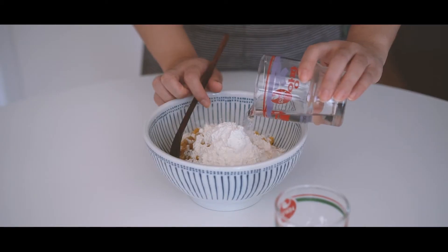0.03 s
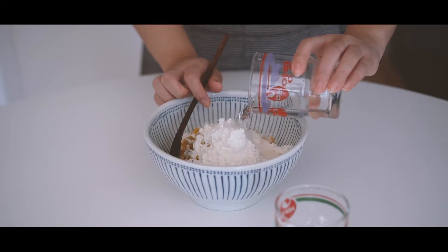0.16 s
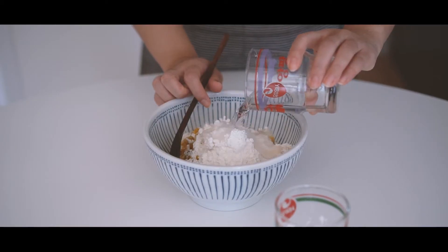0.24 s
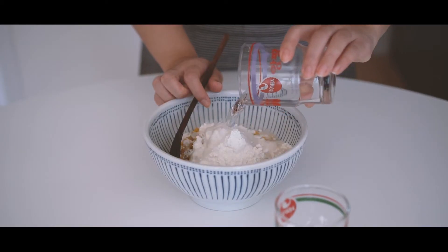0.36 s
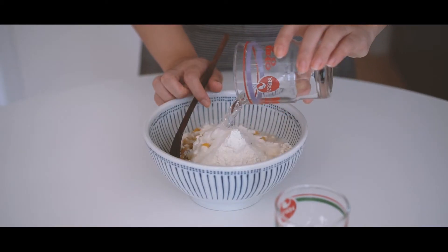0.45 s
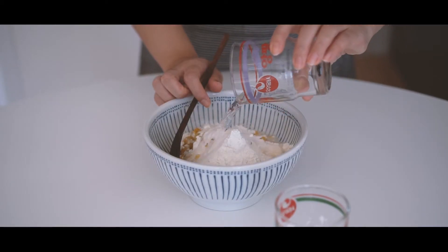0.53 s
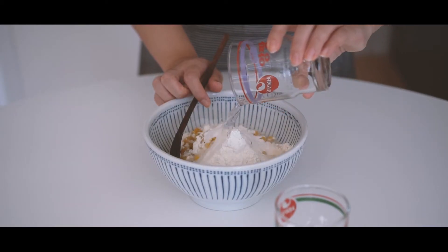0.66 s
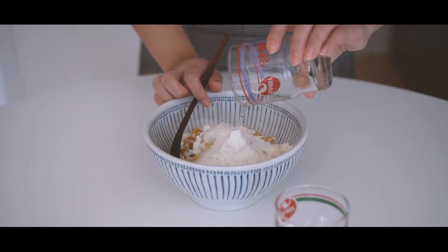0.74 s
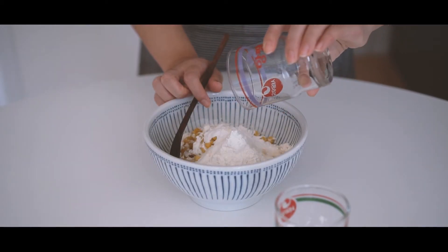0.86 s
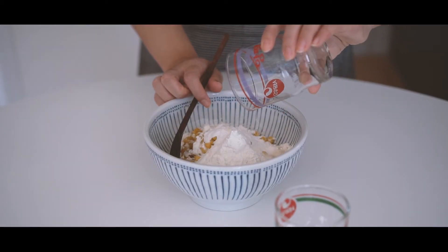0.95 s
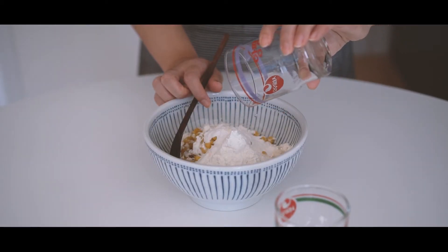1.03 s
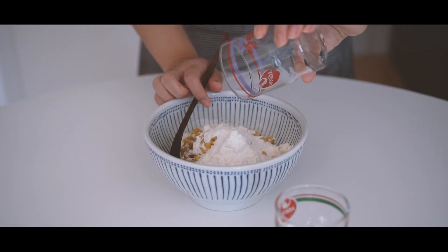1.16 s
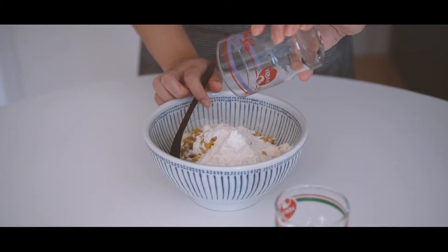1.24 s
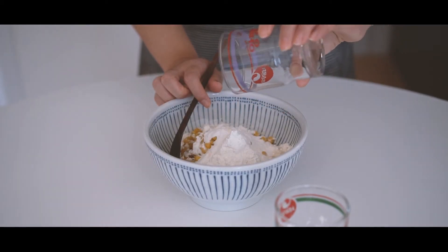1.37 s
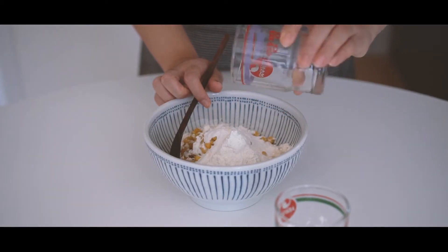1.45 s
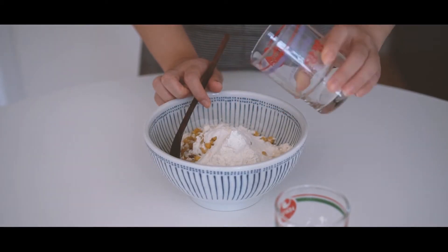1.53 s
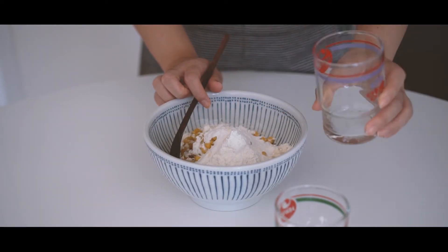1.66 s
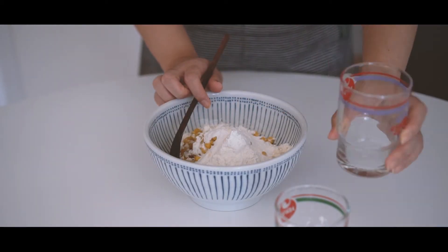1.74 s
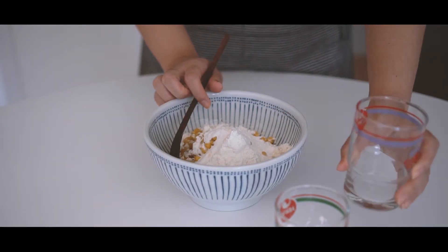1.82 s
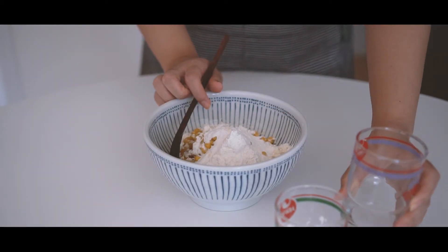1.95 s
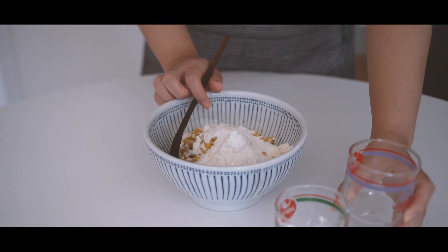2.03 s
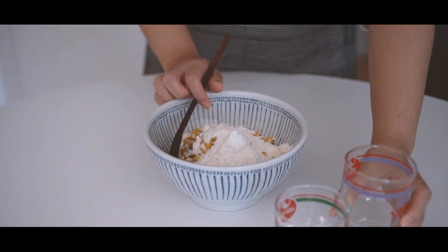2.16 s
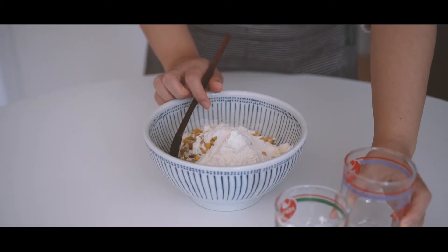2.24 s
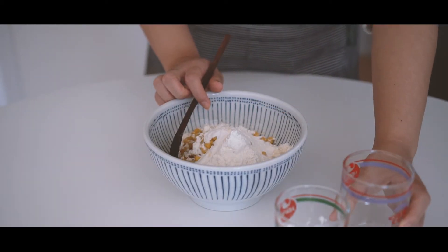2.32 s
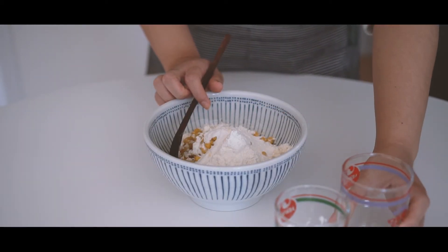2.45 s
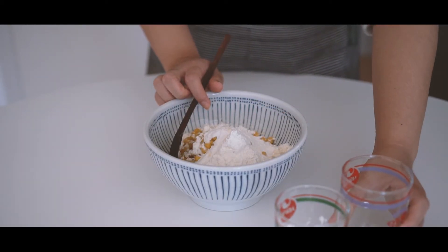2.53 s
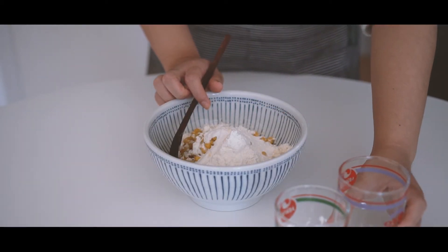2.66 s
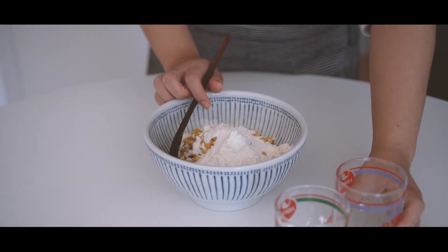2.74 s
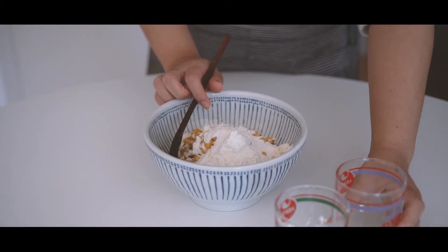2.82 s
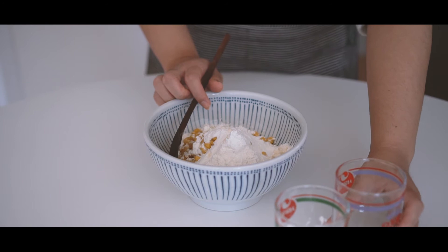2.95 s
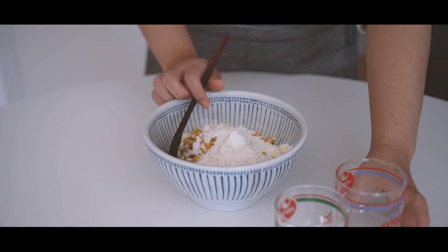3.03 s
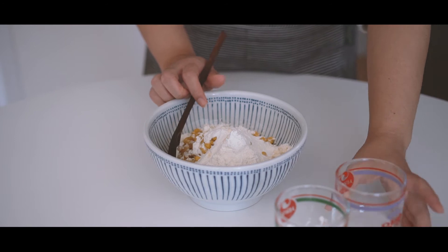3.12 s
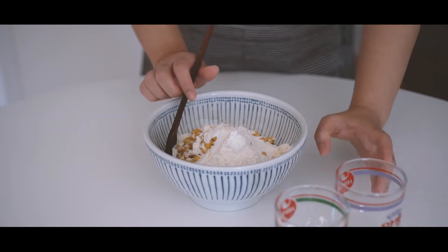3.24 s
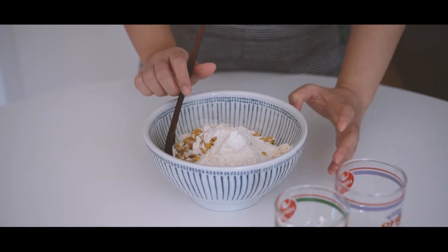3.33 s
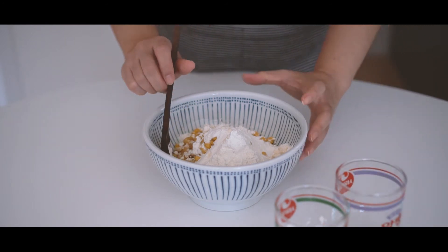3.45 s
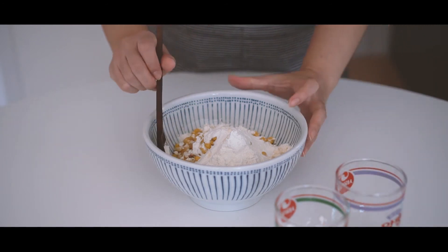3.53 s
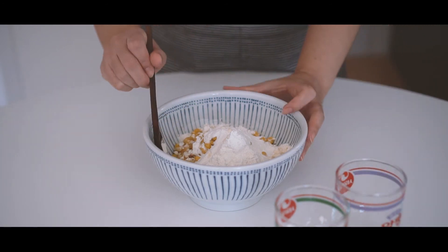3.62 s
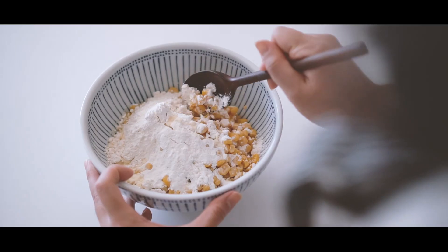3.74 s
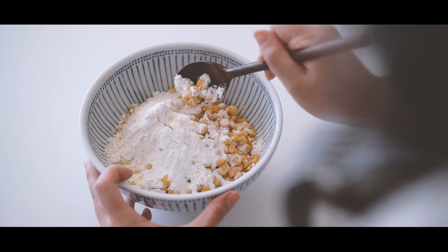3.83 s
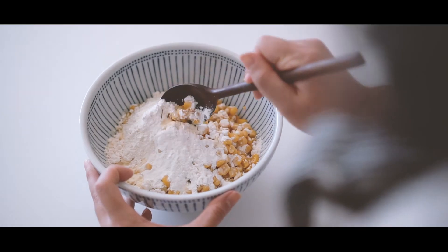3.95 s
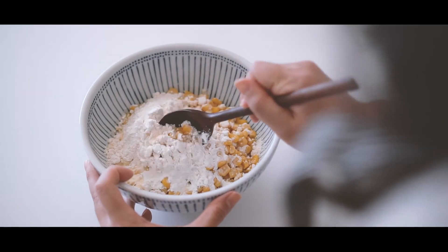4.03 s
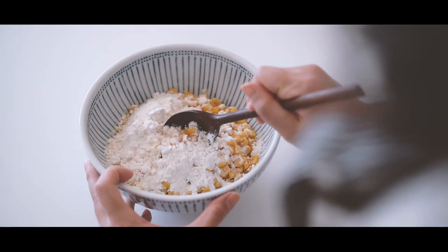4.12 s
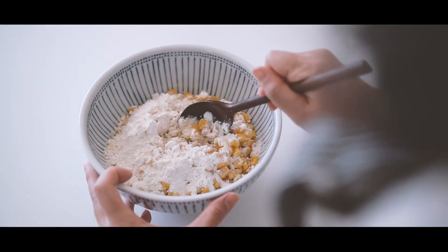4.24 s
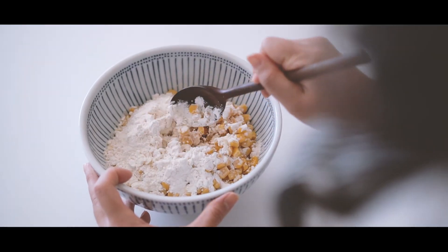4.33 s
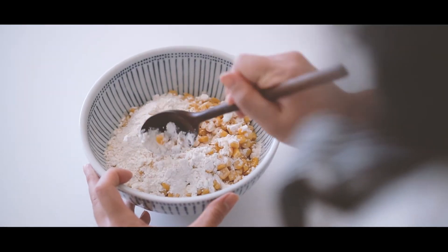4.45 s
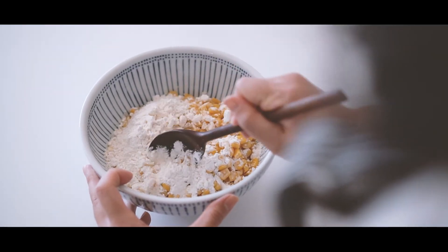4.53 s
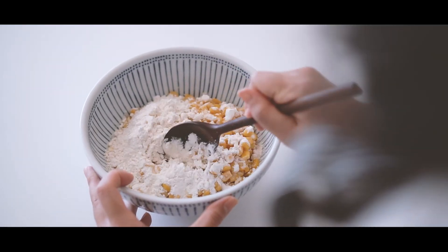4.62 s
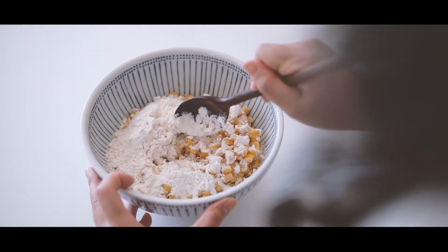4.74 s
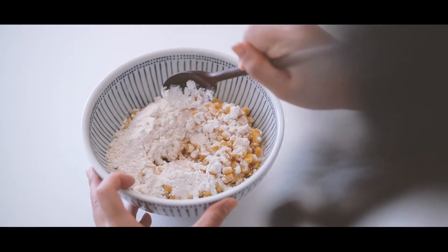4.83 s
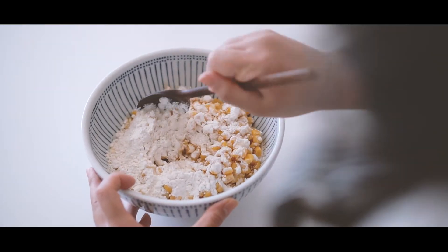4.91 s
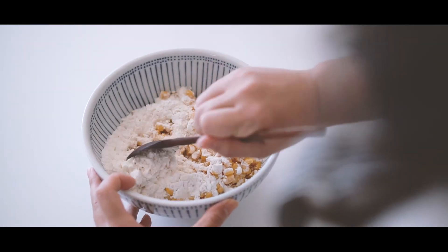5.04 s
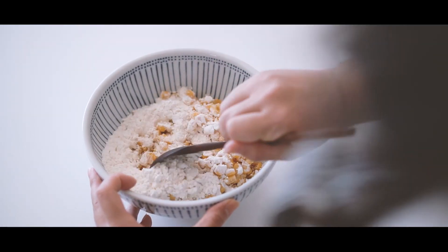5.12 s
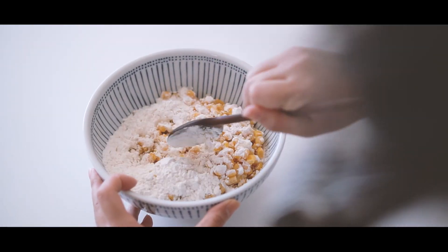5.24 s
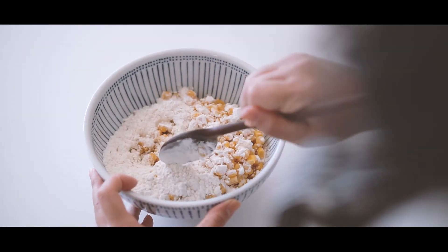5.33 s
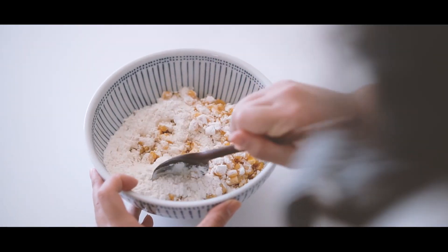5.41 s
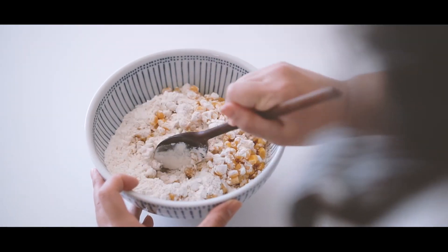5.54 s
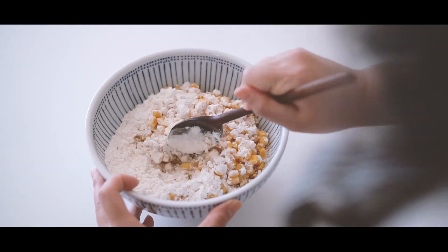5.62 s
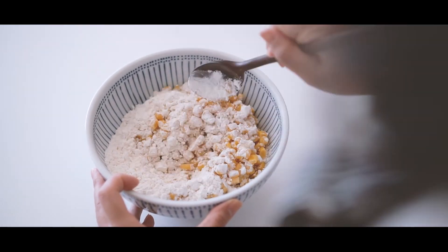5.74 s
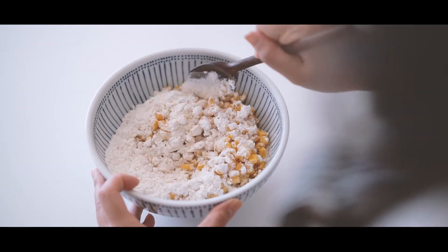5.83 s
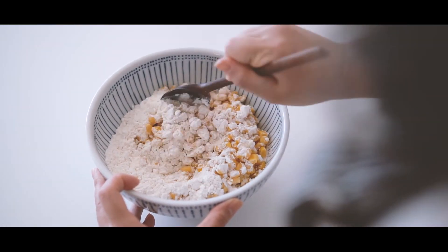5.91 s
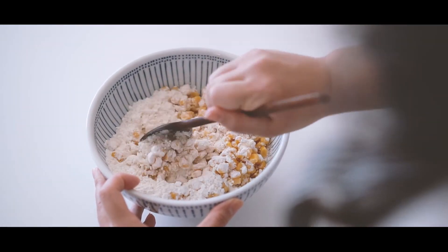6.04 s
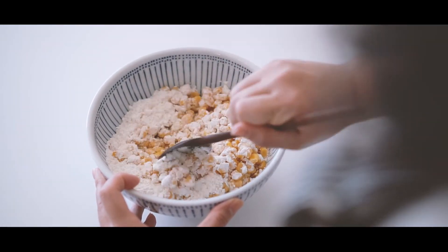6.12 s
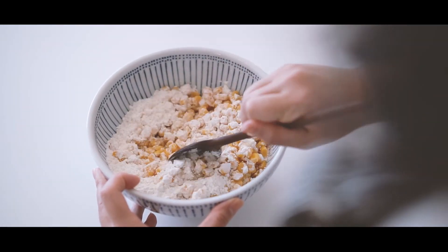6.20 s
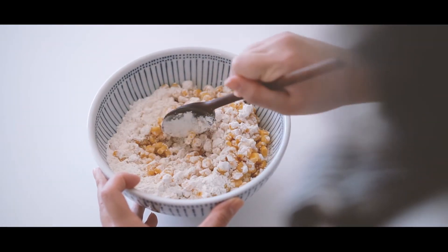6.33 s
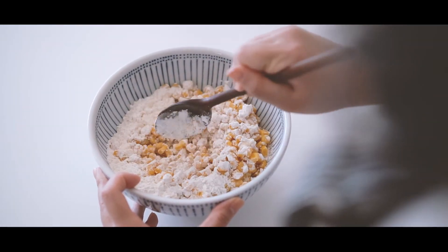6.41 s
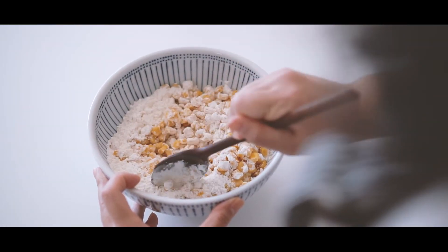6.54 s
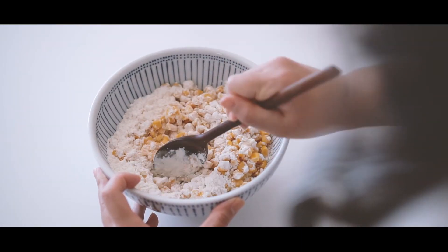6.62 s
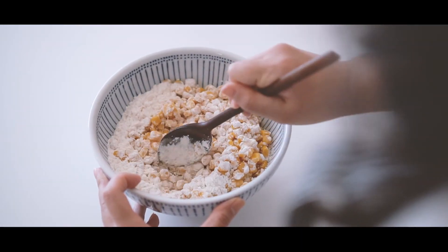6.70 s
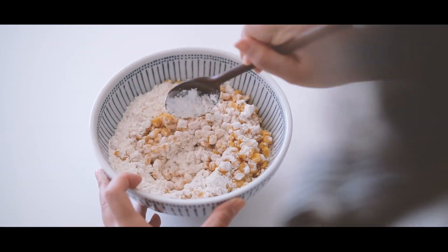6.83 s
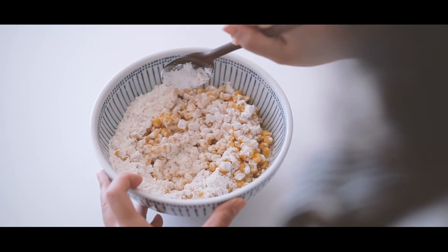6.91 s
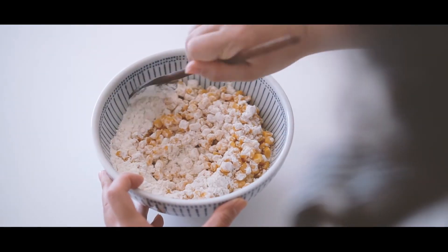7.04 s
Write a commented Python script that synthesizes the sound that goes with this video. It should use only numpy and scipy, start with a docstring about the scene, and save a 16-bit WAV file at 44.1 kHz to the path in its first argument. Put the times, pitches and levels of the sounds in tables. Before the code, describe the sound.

Water briefly trickles onto flour in a ceramic bowl, a glass thuds loudly onto a table, then a wooden spoon softly folds the crumbly mix.

```python
"""Water pours from a glass onto flour and corn in a ceramic bowl: crackling patter, ringing drops, fine spray.
A wooden spoon folds the damp mix, which rustles as grains of noise and ticks in short noise bursts.
An opening knock, the glass set down later, the rocking bowl and the tapping spoon each strike a bank of
decaying modes over damped noise. Around them lie a small, live kitchen with room tone, hum and whine, some of
which change at 3.6 s, and a low rumble that sets in at 3.2 s."""
import sys
import numpy as np
from scipy import signal
from scipy.fft import rfft, irfft, next_fast_len
from scipy.io import wavfile
from scipy.ndimage import uniform_filter1d

SR = 44100
rng = np.random.default_rng(int(sys.argv[2]) if len(sys.argv) > 2 else 0)


def to_wav(s):
    """Save 16-bit WAV."""
    ch = np.atleast_2d(s).T  # columns
    pcm = np.round(np.clip(ch, -1, 1) * 32767)  # PCM
    wavfile.write(sys.argv[1], SR, pcm.astype(np.int16))


N = 311787  # length in samples

# tone of the pouring patter: f/Hz, relative level/dB
POUR_SPECTRUM = [(700, -15), (1400, 2), (2300, 2), (3500, -5), (5000, -15), (7800, -6), (10000, -10),
                 (15000, -13)]
# the largest drops, each trapping a bubble: t/s, level/dB, f/Hz, t60/s
LARGE_DROPS = [(0.5922, -37, 2100, .012), (0.6, -38.5, 8140, .016), (0.6218, -36.5, 2680, 0.0074),
               (0.718, -39, 8000, 0.013), (0.7275, -41.5, 9400, 0.027), (0.7321, -26.5, 2440, 0.011),
               (0.737, -40, 2380, 0.042), (0.777, -45, 2120, 0.046), (0.795, -47, 2280, 0.037),
               (0.879, -36, 2420, 0.006), (0.9605, -42, 3070, 0.011)]
# the loudest sticky ticks and crunches of wet flour and kernels: t/s, peak level/dB, f/Hz (centre), t60/s
LOUD_TICKS = [(0.3085, -46, 8050, 0.0096), (0.3497, -50, 5500, .005), (0.6283, -43.5, 8000, 0.01),
              (0.6468, -46, 5000, .005), (0.973, -49, 9000, .006), (1.978, -52.5, 5500, 0.018),
              (3.691, -54, 3040, .044), (3.766, -47.5, 8900, 0.01), (3.7666, -44.5, 2730, .012),
              (3.873, -45.5, 3500, 0.0071), (4.126, -54, 3000, 0.054), (4.1815, -52, 13070, 0.0046),
              (4.3015, -46, 9100, 0.0034), (4.9098, -44, 7600, 0.0023), (5.143, -47.5, 10100, 0.0052),
              (5.276, -50.5, 9000, 0.0076), (5.4473, -41, 10900, 0.0046), (5.558, -50, 2920, .02),
              (5.911, -39.5, 2070, 0.03), (5.911, -48, 7040, 0.023), (6.155, -50.5, 8500, 0.0071)]
# the spoon's strokes through the mix: t/s (start), length/s, level/dB
SPOON_STROKES = [(3.19, .2, -66), (3.63, .3, -65), (4.07, .33, -67.5), (4.61, .23, -65.5), (4.94, .16, -70),
                 (5.09, .19, -65), (5.39, .42, -64.5), (5.87, .22, -64), (6.24, .19, -65), (6.6, .1, -64),
                 (6.72, .18, -67)]
# tone of the rubbing crumbs: f/Hz, relative level/dB
CRUMB_SPECTRUM = [(600, 12.5), (1700, 12), (3300, 3.5), (4500, -3), (6300, -13), (7900, 3), (10000, -11),
                  (15000, -5)]
# fingers slide off the glass: t/s (start), length/s, level/dB
FINGER_SLIDES = [(3.02, 0.25, -63.5), (3.36, 0.11, -69.5)]
# tone of skin on glass: f/Hz, relative level/dB
SKIN_SPECTRUM = [(2500, -9.5), (5500, -9), (8000, -0.5), (11000, -6), (15000, -6)]
# something knocks on the table at the start; later the glass is set down:
# t/s, level/dB, f/Hz (brightness), f/Hz (bass cut), f/Hz (modes at rest at the contact)
TABLE_KNOCKS = [(0.0, -26.5, 1010, 30, 320), (2.8196, -12, 3200, 110, 732), (2.9181, -19.5, 654, 280, 950),
                (2.9272, -17.5, 2280, 276, 1305), (2.9311, -22.5, 640, 250, 980)]
# clear modes of the table with the glass on it: f/Hz, relative level/dB, t60/s
TABLE_RING = [(143, -11, .45), (312, -4, .25), (405, -7, .1), (441, -3, .12), (478, -3, .18), (534, 2, .13),
              (585, -7, .14), (650, -12, .1), (732, -6, .17), (794, -7, .17), (914, -8, .16), (971, 1, .15),
              (1053, -9, .14), (1139, -3, .42), (1202, -4, .16), (1290, -9, .11), (1336, -1, .12),
              (1428, -13, .14), (1653, -17, .15), (1740, -17, .1), (1816, -13, .11), (1985, -32, .25),
              (2056, -28, .06), (2385, -22, .09), (2460, -21, .07), (2573, -24, .06), (2789, -30, .1),
              (3080, -24, .05)]
# the table's dense, quickly damped modes: f/Hz, relative level/dB
TABLE_THUD = [(50, -23.5), (130, -0.5), (240, -3), (450, 5.5), (850, 1.5), (1330, 2.5), (1550, -9),
              (2100, -17), (3000, -22), (3400, -30.5), (5200, -37), (7000, -46), (15000, -50)]
# the bowl rocks on its foot: t/s, level/dB, f/Hz (brightness), f/Hz (bass cut)
BOWL_ROCKS = [(0.6005, -46.5, 900, 150), (4.4617, -28, 990, 82), (4.6315, -29, 860, 69),
              (4.9428, -41.5, 596, 69.5), (6.275, -46.5, 500, 120), (6.93, -31, 890, 79)]
# clear modes of the full bowl on the table: f/Hz, relative level/dB, t60/s
BOWL_RING = [(140.6, -4, 0.25), (222, -25, 0.031), (253.5, 7, 0.085), (337, -3, 0.16), (403.5, -4, 0.23),
             (433, 4.5, 0.18), (582, 4, 0.12), (605, -6.5, 0.18), (777, -15.5, 0.2), (860, -29, 0.14),
             (1123, -28, 0.19), (1360, -18, .13)]
# the bowl's dense, damped modes: f/Hz, relative level/dB
BOWL_THUD = [(60, 7.5), (230, 10.5), (580, 0.5), (720, 0), (1150, -1.5), (1800, -18), (4000, -32),
             (15000, -33)]
# the bowl rings in the opening knock at 0 s; the resting spoon taps the bowl at 0.199 s, and the last row is #
# the early echo of that tap off a wall or ceiling: t/s, level/dB, f/Hz (brightness), f/Hz (bass cut)
TAPS_AND_ECHO = [(0.0, -29, 1500, 200), (0.199, -32, 2600, 120), (0.2124, -28, 900, 250)]
# clear modes of the bowl under the spoon's taps: f/Hz, relative level/dB, t60/s
TAP_RING = [(305, -8, .13), (450, -14, .09), (598, 0, .12), (684, -9, .13), (834, -8, .12), (930, -8, .1),
            (1000, -12, .1), (1400, -18, .1), (1630, -17, .08)]
# tone of the still room: f/Hz, relative level/dB (per Hz)
AIR_SPECTRUM = [(15, 9.5), (27, 7), (40, -2.5), (70, 3.5), (110, 2.5), (200, 1), (450, -3.5), (800, -9),
                (1500, -16.5), (2600, -22.5), (4500, -28.5), (6300, -30.5), (8200, -30), (15500, -35.5)]
# hum and whine, some of which stop or start at 3.6 s: f/Hz, rms level/dB, t/s (from), t/s (to)
HUM_AND_WHINE = [(49.5, -50, 0, 8), (95, -65, 0, 8), (236, -63, 3.6, 8), (366, -74, 0, 3.6),
                 (461, -69, 0, 8), (2525, -85, 3.6, 8), (2562, -88, 0, 3.6), (2859, -89, 0, 3.6),
                 (13878, -83, 0, 3.6), (13862, -85, 3.6, 8)]
# tone of the low rumble: f/Hz, relative level/dB
RUMBLE_SPECTRUM = [(3, -51.5), (8, 2), (13, 5), (20, -2), (30, -17.5), (45, -23.5), (70, -41.5),
                   (140, -49.5), (400, -110)]

TIME = np.arange(N) / SR
RING = TIME[:SR]  # the one-second clock of a single event
# the stream swells as the glass tips, holds full flow briefly and dwindles
POUR_FULL_S, POUR_HOLD_S, POUR_DB = 0.6, 0.25, -64
POUR_RISE_DB_PER_S, POUR_FALL_DB_PER_S = 64.5, 90.5
STROKE_ATTACK = 0.25  # share of a stroke spent building up pressure
RUMBLE_START_S, RUMBLE_RISE_S, RUMBLE_DB, RUMBLE_WAVER_DB = 3.2, 0.7, -29, 1.5
TOP_HZ = 15800  # upper band edge of the recorder


def water(droplet_db=-52, spread_db=5, droplet_hz=2300, octaves=0.42, droplet_t60=0.013, count=24):
    """Large drops ring over the patter of the stream, whose flow also throws droplets and fine spray."""
    flow = pour()
    out = colour(crackle(per_s=380, spread_db=4.0), POUR_SPECTRUM) * flow
    for s, db, hz, t60 in LARGE_DROPS:
        add(out, s, undb(db) * drop(hz, t60))
    for s, size, pitch in scatter(flow, count):
        droplet = drop(droplet_hz * 2 ** (octaves * pitch), droplet_t60)
        add(out, s, undb(droplet_db + spread_db * size) * droplet)
    spray = snaps(flow, db=-49, spread_db=2.5, hz=8000, octaves=0.6, t60=0.0063, count=13)
    return out + spray


def pour():
    """Gain of the stream over time: it rises, holds and falls in straight lines of dB."""
    early = np.maximum(POUR_FULL_S - TIME, 0)
    late = np.maximum(TIME - POUR_FULL_S - POUR_HOLD_S, 0)
    return undb(POUR_DB - POUR_RISE_DB_PER_S * early - POUR_FALL_DB_PER_S * late)


def drop(hz, t60, splash_db=-8):
    """A drop splashes and rings the bubble that it traps."""
    splash = cut(rng.standard_normal(SR), hz / np.sqrt(2), "high", order=3)
    splash = unit(cut(splash, hz, "low", order=4))
    return 0.59 * bubble(hz, t60) + undb(splash_db) * splash * fade(t60)


def bubble(hz, t60, rise_per_s=7):
    """A bubble rings higher as it nears the surface; the rise is a fraction of its pitch per second."""
    return np.sin(2 * np.pi * hz * RING * (1 + rise_per_s * RING / 2)) * fade(t60)


def ticks():
    """The damp mix ticks: a few loud snaps, and small ones wherever the spoon presses."""
    pressure = strokes(SPOON_STROKES)
    out = snaps(pressure, db=-51, spread_db=5, hz=7900, octaves=0.4, t60=0.0036, count=22)
    for s, db, hz, t60 in LOUD_TICKS:
        add(out, s, undb(db) * snap(hz, t60))
    return out


def rubbing():
    """Crumbs shear along the spoon; skin slides over glass with a finer grain."""
    crumbs = colour(crackle(per_s=1400, spread_db=3.0), CRUMB_SPECTRUM) * strokes(SPOON_STROKES)
    skin = colour(crackle(per_s=8700, spread_db=3.0), SKIN_SPECTRUM) * strokes(FINGER_SLIDES)
    return crumbs + skin


def strokes(rows):
    """Pressure over time: each stroke builds up and eases off in one arch."""
    pressure = np.zeros(N)
    for s, length, db in rows:
        corners = [s, s + STROKE_ATTACK * length, s + length]
        pressure += undb(db) * np.sin(np.interp(TIME, corners, [0, np.pi / 2, np.pi]))
    return pressure


def snap(hz, t60):
    """A wet film breaks or a kernel crunches: a short, broad burst with peak 1."""
    burst = cut(rng.standard_normal(SR) * fade(t60), hz * 1.05, "high")
    burst = cut(burst, hz * 0.96, "low", order=3)
    return burst / np.abs(burst).max()


def snaps(activity, db, spread_db, hz, octaves, t60, count):
    """Many small snaps of varied size and pitch that follow an activity."""
    out = np.zeros(N)
    for s, size, pitch in scatter(activity, count):
        add(out, s, undb(db + spread_db * size) * snap(hz * 2 ** (octaves * pitch), t60))
    return out


def table():
    """Something knocks at the start; later the glass lands on one edge and settles flat, and the table booms."""
    response = struck(TABLE_RING, TABLE_THUD, body_db=-10.5, body_t60=0.049,
                      crack_db=5.5, crack_t60=0.038, echo_s=0.0135, echo_db=-4.5)
    return sum(blows([blow], node(response, node_hz)) for *blow, node_hz in TABLE_KNOCKS)


def node(x, hz, depth_db=-9, sharpness=3.9):
    """Modes that stand still at the point of contact are hardly excited: a partial notch."""
    b, a = signal.iirnotch(hz, sharpness, fs=SR)
    return undb(depth_db) * x + (1 - undb(depth_db)) * signal.lfilter(b, a, x)


def bowl():
    """The bowl tips under the spoon and its foot comes down, muffled by the mix."""
    response = struck(BOWL_RING, BOWL_THUD, body_db=-14, body_t60=0.13,
                      crack_db=-4, crack_t60=0.028, echo_s=0.0117, echo_db=-1)
    return blows(BOWL_ROCKS, response)


def spoon():
    """The bowl rings in the opening knock; then a light tap of wood, with an early echo, rings it over the
    table's damped body."""
    response = struck(TAP_RING, TABLE_THUD, body_db=-13, body_t60=0.09,
                      crack_db=-3, crack_t60=0.025, echo_s=0.0135, echo_db=-5)
    return blows(TAPS_AND_ECHO, response)


def struck(modes, body, body_db, body_t60, crack_db, crack_t60, echo_s, echo_db):
    """Response to one blow: clear modes over a mass of damped ones, whose attack a near wall throws back."""
    # each mode shape points up or down at the point of contact
    signs = np.sign(np.cos(1.9 * np.arange(len(modes))))
    clear = np.zeros(SR)
    for sign, (hz, db, t60) in zip(signs, modes):
        clear += sign * undb(db) * np.sin(2 * np.pi * hz * RING) * fade(t60)
    attack = undb(crack_db) * fade(crack_t60)
    shape = undb(body_db) * fade(body_t60) + attack
    add(shape, echo_s, undb(echo_db) * attack)
    damped = colour(shape * rng.standard_normal(SR), body)
    return 0.5 * clear + damped


def blows(rows, response):
    """Play a response at each row; a soft contact loses treble, a light one loses bass."""
    out = np.zeros(N)
    for s, db, bright_hz, bass_hz in rows:
        softened = cut(response, bright_hz, "low")
        add(out, s, undb(db) * cut(softened, bass_hz, "high", order=1))
    return out


def kitchen(x, wet_db, t60=0.43):
    """Direct sound plus the diffuse ring of hard walls, duller than the source."""
    wall_spectrum = [(60, -8.5), (300, -1.5), (1200, 1), (3000, -2.5), (8000, 3), (15000, -25.5)]  # f/Hz, dB
    tail = colour(rng.standard_normal(SR), wall_spectrum) * fade(t60)
    tail = tail * np.clip(RING / 0.012 - 0.5, 0, 1)  # silent for 6 ms, full at 18 ms
    tail = tail / np.sqrt(np.sum(tail ** 2))
    return x + undb(wet_db) * signal.fftconvolve(x, tail)[:N]


def background(air_db=-53.5, drift=0.18):
    """Noise for room tone and rumble; sines of wandering phase (drift in radians) for hum and whine."""
    air = colour(rng.standard_normal(N), AIR_SPECTRUM) * undb(air_db)
    hum = np.zeros(N)
    for hz, db, start, end in HUM_AND_WHINE:
        running = uniform_filter1d(1. * ((TIME >= start) & (TIME < end)), size=2000)
        tone = np.sqrt(2) * np.sin(2 * np.pi * hz * TIME + drift * walk(12.0))
        hum += running * undb(db) * tone
    onset = np.clip((TIME - RUMBLE_START_S) / RUMBLE_RISE_S, 0, 1)
    level = undb(RUMBLE_DB + RUMBLE_WAVER_DB * walk(3.2))
    rumble = unit(colour(rng.standard_normal(N), RUMBLE_SPECTRUM)) * onset * level
    return air + hum + rumble


def undb(db):
    """Decibels to gain."""
    return 10 ** (np.asarray(db) / 20)


def unit(x):
    """Scale to rms 1."""
    return x / np.sqrt(np.mean(x ** 2))


def fade(t60):
    """One second of exponential decay that falls 60 dB in t60 seconds."""
    return np.exp(-np.log(1000) * RING / t60)


def colour(x, points):
    """Causal minimum-phase filter with a smooth (f/Hz, level/dB) spectrum; white noise keeps its power."""
    hz, db = np.transpose(points)
    size = 2 * next_fast_len(len(x))
    bins_hz = np.maximum(np.fft.rfftfreq(size, 1 / SR), 1)
    gain = unit(undb(np.interp(np.log(bins_hz), np.log(hz), db)))
    # folding the cepstrum forward in time makes the filter causal
    cepstrum = irfft(np.log(gain))
    cepstrum[1:size // 2] *= 2
    cepstrum[size // 2 + 1:] = 0
    return irfft(rfft(x, size) * np.exp(rfft(cepstrum)))[:len(x)]


def cut(x, hz, kind, order=2):
    """Butterworth low-pass or high-pass."""
    sos = signal.butter(order, min(hz, SR / 2 - 1000), kind, fs=SR, output="sos")
    return signal.sosfilt(sos, x)


def walk(rate):
    """Slow random wander with rms near 1: smoothed random steps, rate per second."""
    k = int(SR / rate)
    steps = np.repeat(rng.standard_normal(N // k + 1), k)
    return unit(uniform_filter1d(steps, k)[:N])


def crackle(per_s, spread_db):
    """Tiny clicks at random moments, mostly small and a few large, at rms 1."""
    sizes = undb(spread_db * np.minimum(rng.exponential(size=N), 4))
    present = rng.random(N) < per_s / SR
    return unit(present * sizes * rng.choice([-1, 1], N))


def scatter(activity, count):
    """Random events, crowded where activity is high: rows of t/s, size and pitch deviates from -1 to 1."""
    chance = rng.random((count, 3))
    share = (np.arange(count) + chance[:, 0]) / count
    times = np.interp(share, np.cumsum(activity) / np.sum(activity), TIME)
    return np.column_stack([times, 2 * chance[:, 1:] - 1])


def add(track, s, sound):
    """Mix a sound into the track at time s, in seconds."""
    i = max(int(s * SR), 0)
    track[i:i + len(sound)] += sound[:len(track) - i]


def scene():
    """Every contact and splash sounds into the same room, over the background."""
    pouring = kitchen(water(), wet_db=-12.0)
    stirring = kitchen(ticks() + rubbing(), wet_db=-11.0)
    heavy = kitchen(table(), wet_db=-12.5)
    dull = kitchen(bowl() + spoon(), wet_db=-12.5)
    return (pouring + stirring + heavy + dull + background())[None]


def record(dry):
    """The recorder rounds the highest peaks and cuts the top."""
    rounded = 0.9 * np.tanh(dry / 0.86)
    low_pass = signal.ellip(10, 0.1, 80, TOP_HZ, fs=SR, output="sos")
    return signal.sosfilt(low_pass, rounded)


dry = scene()
out = record(dry)
to_wav(out)
```